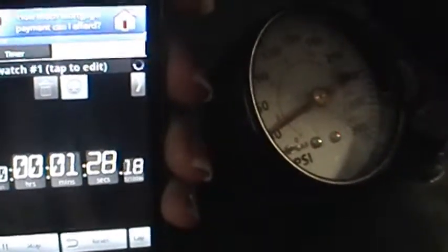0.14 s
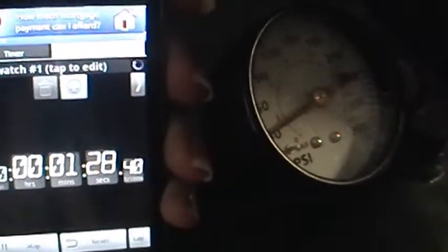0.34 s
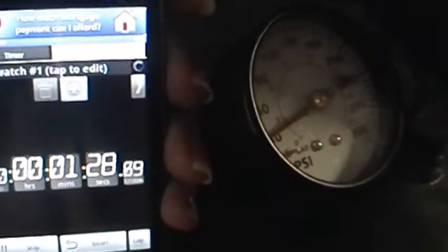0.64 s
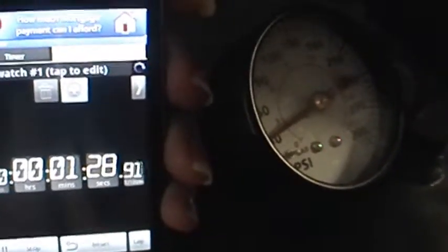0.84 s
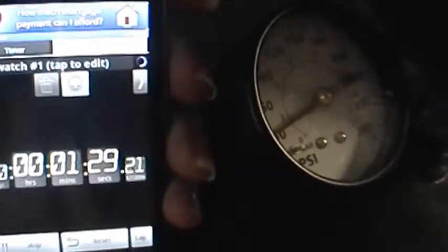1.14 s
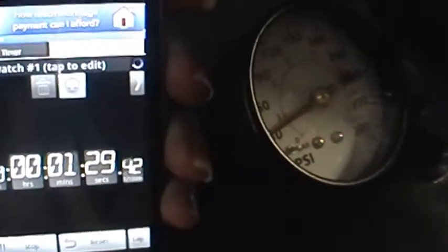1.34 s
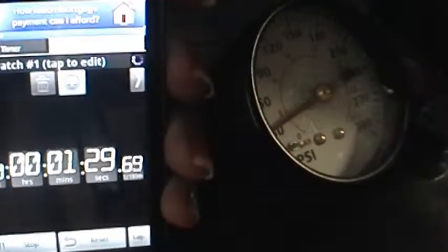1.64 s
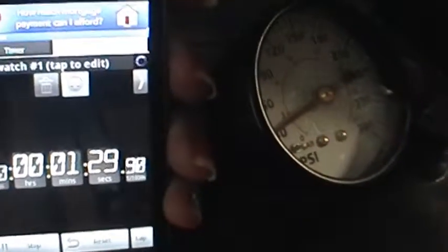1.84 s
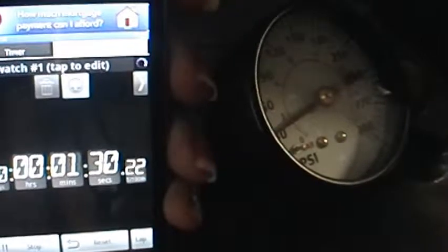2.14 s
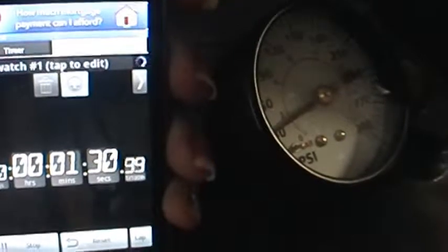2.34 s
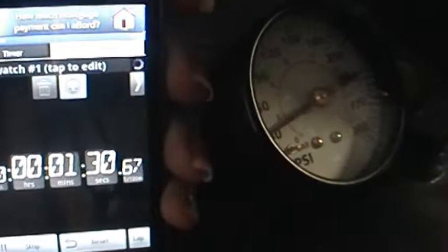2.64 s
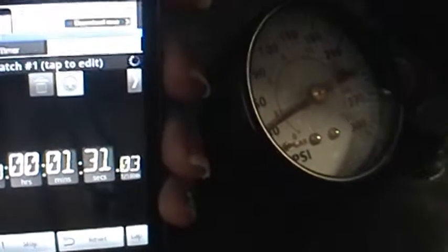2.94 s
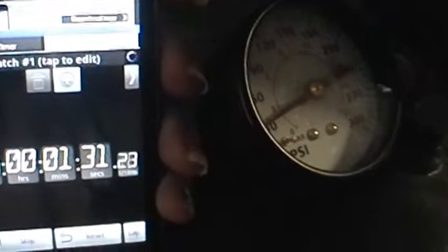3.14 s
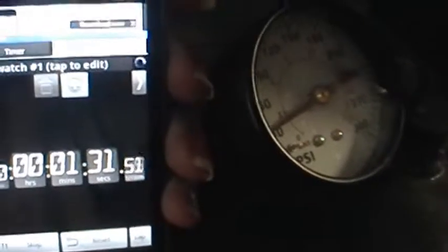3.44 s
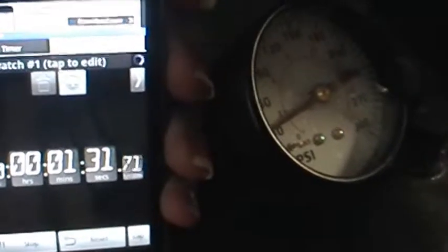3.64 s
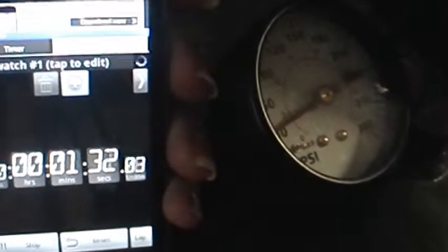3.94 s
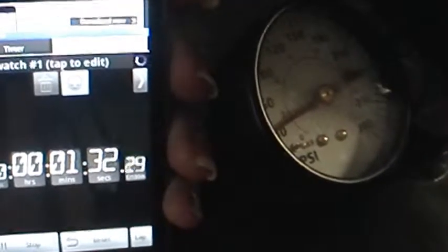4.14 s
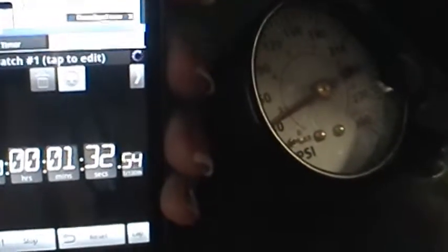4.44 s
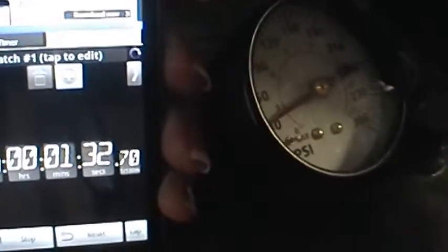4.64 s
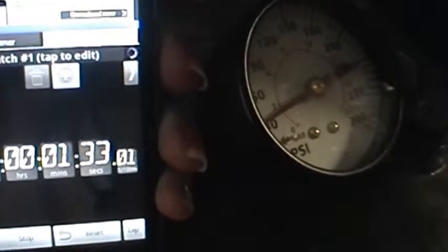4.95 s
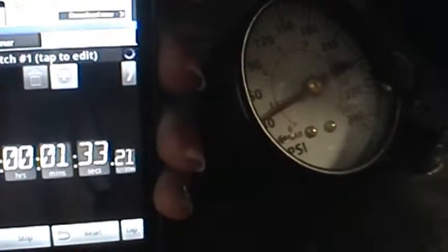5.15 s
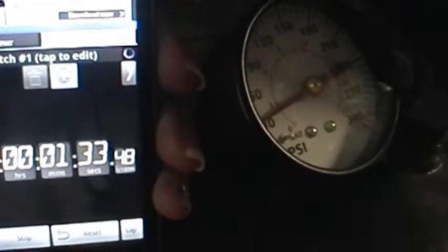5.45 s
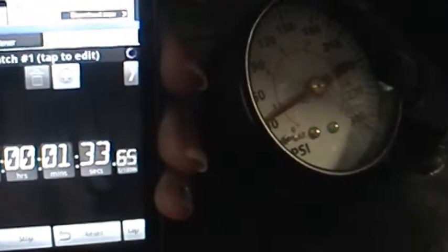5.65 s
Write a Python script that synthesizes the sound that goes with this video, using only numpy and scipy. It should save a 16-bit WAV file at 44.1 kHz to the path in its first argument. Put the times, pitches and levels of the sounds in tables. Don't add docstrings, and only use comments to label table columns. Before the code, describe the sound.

A two-piston air compressor drones loudly and steadily, with rapid metallic knocking, pulsing air hiss and a low motor hum in a small workshop.

```python
import sys
import numpy as np
from scipy import signal
from scipy.fft import rfft, irfft
from scipy.io import wavfile
from scipy.ndimage import uniform_filter1d

SR = 44100
rng = np.random.default_rng(int(sys.argv[2]) if len(sys.argv) > 2 else 0)


def nominal_scale(level):
    x = np.asarray(level, float) / 20
    return 10 ** x


def int16_out(signal):
    q = np.round(np.clip(np.atleast_2d(signal).T, -1, 1) * 32767)
    wavfile.write(sys.argv[1], SR, q.astype(np.int16))


N = 255780

# time in seconds, speed in turns per second.
SPEED = [(0, 16.917), (5.8, 16.911)]
CRANK_HZ = SPEED[0][1]
FIRST_TURN_S = .118

# multiple of the crank rate, level in dB.
DRONE = [(4, -53), (6, -44), (8, -41), (10, -42), (13, -55), (14, -43), (15, -46), (16, -40), (17, -43),
         (18, -21), (19, -29), (20, -20), (21, -39), (22, -34.5), (23, -42), (24, -41), (26, -45),
         (29, -43), (30, -41), (32, -42), (33, -44), (34, -40), (36, -44), (37, -44), (38, -37), (40, -43),
         (52, -40), (56, -41), (73, -37), (76, -35)]
STROKE_TURN, INTAKE_HZ = .02, 330
DRONE_LAG, ODD_LAG = .38, .5
SLAP_FROM, SLAP_LATE_TURN, SLAP_AHEAD, SLAP_SPREAD = 25, .05, .75, .3
# level in dB before the camera moves, change in dB after it
PAIR_DB, PAIR_MOVE_DB = (-24, -19.3), (4.9, -.5)
SHORTFALL_DB, SETTLE_S = -0.3, 0.17

KNOCK_TURNS = [-.015, .06, .16, .25, .51, .56, .61, .7, .81, .9]
# thud in dB, tank ring in dB, clack in dB, head ring in dB.
KNOCKS = [
    (-11, 0, -3, 1),
    (-4, -17, -5, -2),
    (-4, -17, -6, -8),
    (-5, -15, -6, -10),
    (-11, -11.5, -2, -1),
    (-11, -12, -8, 0),
    (0, -14, -4, -8),
    (-5, -12.5, -6, -2),
    (-5, -13.5, -7, -9),
    (-7, -15, -7, -9),
]
KNOCK_SLIP_S, KNOCK_SCATTER_DB = .00007, (1.2, 1.4, 1.2, 3)
RING_LEAD_S = .0017
# level in dB before the camera moves, change in dB after it
PARTS_DB, PARTS_MOVE_DB = (-27.5, -21, -28, -24), (-4.5, 0.5, -1.5, -1)
# dB, for thud, tank, clack and head.
DRY_SHARE_DB = (-0.75, 0.2, 0.037, -1.57)
TANK_SAG_S, TANK_SAG_WIDTH_S, TANK_SAG_DB, TANK_STEADIES = 2.3, .5, -2.5, .5

# pitch in Hz, width in Hz, level in dB.
TANK = [(1056, 17, 0), (1099, 15, -3.5), (1260, 90, -18)]
# pitch in Hz, width in Hz, level in dB.
HEAD = [(2480, 50, -9), (2675, 90, 0), (2830, 50, -6), (2950, 40, -5)]
# pitch in Hz, width in Hz, level in dB.
REEDS = [(6275, 60, -2), (7800, 80, 0), (8070, 60, -4), (8410, 70, 0), (8695, 70, -2), (9005, 90, -2),
         (9340, 70, 0), (9460, 40, 0), (9680, 90, -2), (10110, 90, -3), (10745, 150, -6), (12880, 90, -5),
         (14860, 90, -6)]
# pitch in Hz, width in Hz, level in dB.
WHINE = [(2948, 6, 0), (2841, 9, -4), (2165, 10, -8), (1940, 10, -9)]
# frequency in Hz, level in dB.
THUD = [(150, -58.5), (240, -16), (330, 1.5), (480, -2.5), (640, -3), (800, -3), (950, -6), (1200, -22.5),
        (1600, -30.5)]
# frequency in Hz, level in dB.
CLACK = [(900, -39), (1300, -2), (1560, 3), (1800, 0.5), (2050, 2.5), (2300, -1.5), (3000, -9), (3700, -59),
         (4600, -29.5)]
# frequency in Hz, level in dB.
TANK_RANGE = [(800, -28), (1005, -5), (1045, 0), (1300, -2), (1500, -25)]
HEAD_RANGE = [(1700, -34.5), (2300, -0.5), (3400, 1), (3750, -3), (4200, -47.5)]
# frequency in Hz, level in dB.
HISS = [(2530, -55), (4300, -22), (4710, -30), (5160, -6), (5900, -3.5), (6130, -6), (7160, 1),
        (7560, -8.5), (9310, -2.5), (12500, -2.5), (13400, -2), (14250, -4), (15000, -10), (15800, -20)]
# frequency in Hz, level in dB.
RUMBLE = [(20, -16), (60, -8), (110, 4), (190, -4.5), (320, 8), (500, 2.5), (1000, 5.5), (2000, -1),
          (2800, 11.5), (3700, -5), (4600, -18.5)]
HISS_DB, REEDS_DB, RUMBLE_DB, WHINE_DB = -35, -33.5, -25.5, -35
# opening in turns, level in dB, fade in turns, flutter in Hz, depth 0-1.
BREATHS = [
    (.095, 0, .17, 480, .7),
    (.58, -5.5, .8, 340, .5),
]
LEAK_DB = -7
# pitch in Hz, level in dB.
HUM = [(119.96, -37)]

# frequency in Hz, level in dB.
WIDTH = [(60, -16), (250, -47), (400, -24.5), (520, -17.5), (640, -6), (800, -6), (1050, -23), (1300, -19),
         (1550, -11.5), (2700, -19.5), (4500, -0.5), (7900, -5), (9100, -20), (10500, -10)]
# frequency in Hz, level in dB.
MIC = [(1950, 0), (2090, -4), (2300, 0), (3050, 0), (3200, -3), (3520, 3), (3880, -4), (4250, 0)]
# frequency in Hz, level in dB.
MIC_NOISE = [(40, -4), (300, -9), (400, -12), (3000, -12)]
RATTLE_T60_S, ROOM_T60_S, SIDE_T60_S = .02, .2, 0.57
ROOM_DB, MIC_NOISE_DB, LOW_CUT_HZ = -5, -42.5, 46
TOP_HZ, TOP_SHARE = 15230, .16
MOVE_S, MOVE_TAKES_S = 1.3, 0.8


def level(x, db):
    return x * nominal_scale(db) / np.sqrt(np.mean(x ** 2))


def colour(x, points):
    hz, db = np.transpose(points)
    bins = np.arange(1, 2050) * SR / 4096
    log_gain = np.interp(np.log(bins), np.log(hz), db) * np.log(10) / 20
    cepstrum = irfft(log_gain)
    cepstrum[1:2048] *= 2
    cepstrum[2049:] = 0
    response = irfft(np.exp(rfft(cepstrum)))
    return signal.fftconvolve(x, response)[:N]


def ring(x, modes):
    out = 0
    for k, (hz, width, db) in enumerate(modes):
        b, a = signal.iirpeak(hz, hz / width, fs=SR)
        out = out + (-1) ** k * nominal_scale(db) * signal.lfilter(b, a, x)
    return out


def walk(rate):
    hold = int(SR / rate)
    steps = np.repeat(rng.standard_normal(N // hold + 1), hold)
    return 1.3 * uniform_filter1d(uniform_filter1d(steps, hold), hold)[:N]


def echoes(t60):
    t = np.arange(SR // 3) / SR
    tail = rng.standard_normal(len(t)) * np.exp(-np.log(1000) * t / t60)
    return tail / np.sqrt(np.sum(tail ** 2))


def moved(t):
    return .5 - .5 * np.cos(np.pi * np.clip((t - MOVE_S) / MOVE_TAKES_S, 0, 1))


def motor(t):
    hum = 0
    for hz, db in HUM:
        hum = hum + np.sqrt(2) * nominal_scale(db + .5 * walk(3.6)) * np.sin(2 * np.pi * hz * t)
    whine = level(ring(rng.standard_normal(N), WHINE), WHINE_DB)
    rush = level(colour(rng.standard_normal(N), RUMBLE), RUMBLE_DB)
    return hum + whine + rush


def hiss(turns):
    flow = nominal_scale(LEAK_DB)
    for opens, db, fades, flutter_hz, depth in BREATHS:
        since = (turns - opens) % 1
        flutter = 1 + depth * np.sin(2 * np.pi * flutter_hz * since / CRANK_HZ + 0.44 * walk(15))
        shut = np.clip((.5 - since) / .1, 0, 1)
        flow = flow + nominal_scale(db + 1.3 * walk(12)) * flutter * shut * np.exp(-since / fades)
    rush, singing = flow * rng.standard_normal((2, N))
    return level(colour(rush, HISS), HISS_DB) + level(ring(singing, REEDS), REEDS_DB)


def reed_blows(t, turns):
    whole_turns = np.arange(np.floor(turns[0]), turns[-1])
    due = (whole_turns[:, None] + KNOCK_TURNS).ravel()
    chance = rng.standard_normal((len(due), 6))
    place = (np.interp(due, turns, t, left=-1, right=-1) + KNOCK_SLIP_S * chance[:, 0]) * SR
    inside = (place > 0) & (place < N - 1)
    chance[:, 3] *= 1 - TANK_STEADIES * moved(place / SR)
    blows = []
    for k, part_db in enumerate(np.transpose(KNOCKS)):
        db = np.resize(part_db, len(due))
        scatter = .4 * chance[:, 1] + .9 * chance[:, 2 + k]
        size = nominal_scale(db + KNOCK_SCATTER_DB[k] * scatter)
        if k == 1:
            size = size * np.where(db < 0, np.sign(chance[:, 0]), 1)
        blows.append(np.bincount(place[inside].astype(int), size[inside], N))
    return blows


def knocks(t, turns):
    thud, tank, clack, head = reed_blows(t, turns)
    loose = .6 + .9 * rng.standard_normal(N)
    thud = colour(loose * signal.fftconvolve(thud, echoes(RATTLE_T60_S))[:N], THUD)
    clack = colour(loose * signal.fftconvolve(clack, echoes(RATTLE_T60_S))[:N], CLACK)
    lead = int(RING_LEAD_S * SR)
    tank = colour(ring(np.roll(tank, -lead), TANK), TANK_RANGE)
    head = colour(ring(np.roll(head, -lead), HEAD), HEAD_RANGE)
    tank = tank * nominal_scale(TANK_SAG_DB * np.exp(-((t - TANK_SAG_S) / TANK_SAG_WIDTH_S) ** 2))
    parts = zip((thud, tank, clack, head), PARTS_DB, PARTS_MOVE_DB, DRY_SHARE_DB)
    return [level(part, share) * nominal_scale(db + change * moved(t)) for part, db, change, share in parts]


def drone(t, turns):
    pair_db = [db + change * moved(t) for db, change in zip(PAIR_DB, PAIR_MOVE_DB)]
    settling = np.exp(-np.maximum(t - MOVE_S - MOVE_TAKES_S, 0) / SETTLE_S)
    pair_db[0] = pair_db[0] + SHORTFALL_DB * moved(t) * settling
    loudest = dict(zip((18, 20), pair_db))
    out = 0
    for k, db in DRONE:
        above = k * CRANK_HZ > INTAKE_HZ
        lag = np.pi * (DRONE_LAG + above * (1 + ODD_LAG * (k % 2)))
        if k > SLAP_FROM:
            lag = np.pi * (2 * k * SLAP_LATE_TURN - SLAP_AHEAD + SLAP_SPREAD * np.sin(k ** 2))
        if k in loudest:
            db = loudest[k] + .8 * walk(8)
        else:
            db = db + 1.5 * walk(3)
        slip = .004 * k * walk(4)
        out = out + np.sqrt(2) * nominal_scale(db) * np.cos(2 * np.pi * k * (turns - STROKE_TURN) - lag + slip)
    return out


def scene():
    t = np.arange(N) / SR
    turns = np.cumsum(np.interp(t, *np.transpose(SPEED))) / SR - FIRST_TURN_S * CRANK_HZ
    thud, tank, clack, head = knocks(t, turns)
    room = nominal_scale(ROOM_DB) * signal.fftconvolve(thud + clack + head, echoes(ROOM_T60_S))[:N]
    mid = motor(t) + hiss(turns) + thud + tank + clack + head + room + drone(t, turns)
    mic_noise = level(colour(rng.standard_normal(N), MIC_NOISE), MIC_NOISE_DB)
    side = colour(signal.fftconvolve(mid, echoes(SIDE_T60_S))[:N], WIDTH) + mic_noise
    return np.array([mid + side, mid - side])


def band_limit(x):
    return signal.sosfilt(signal.butter(12, 15750, fs=SR, output="sos"), x)


def record(dry):
    low_cut = signal.butter(2, LOW_CUT_HZ, "high", fs=SR, output="sos")
    heard = signal.sosfilt(low_cut, dry)
    heard = np.array([colour(port, MIC) for port in heard])
    heard = np.tanh(.6 * heard) / .6
    top_cut = signal.ellip(10, .1, 50, TOP_HZ, fs=SR, output="sos")
    body = signal.sosfiltfilt(top_cut, heard)
    top = heard - body
    power = uniform_filter1d(np.mean(top ** 2, axis=0), size=1536)
    power = power / uniform_filter1d(power, size=2 * SR)
    gate = uniform_filter1d(1. * (power > np.quantile(power, 1 - TOP_SHARE)), size=512)
    return band_limit(body + gate * top)


dry = scene()
out = record(dry)
int16_out(out)
```